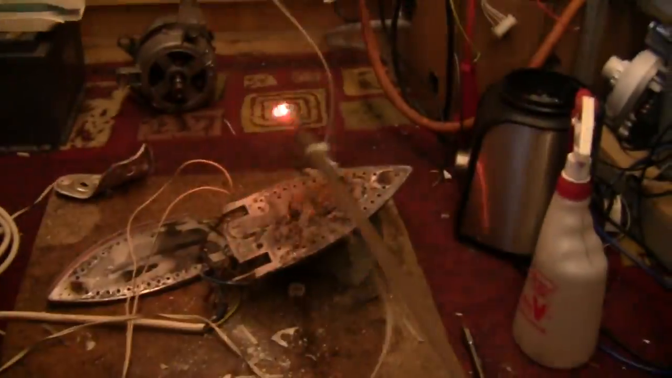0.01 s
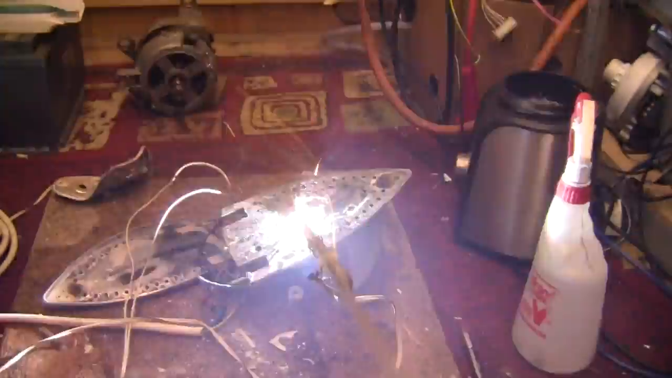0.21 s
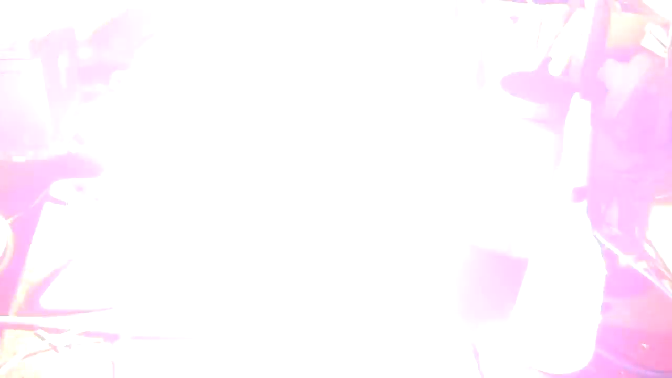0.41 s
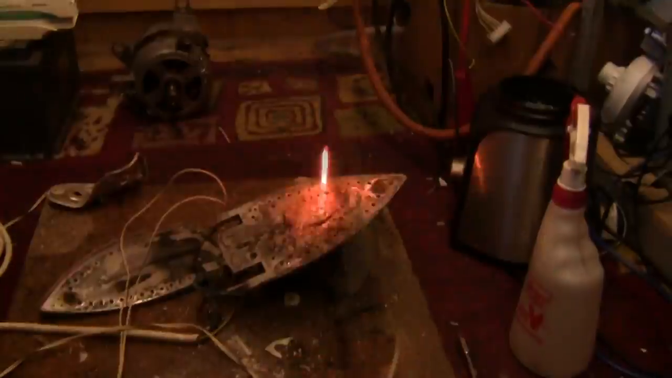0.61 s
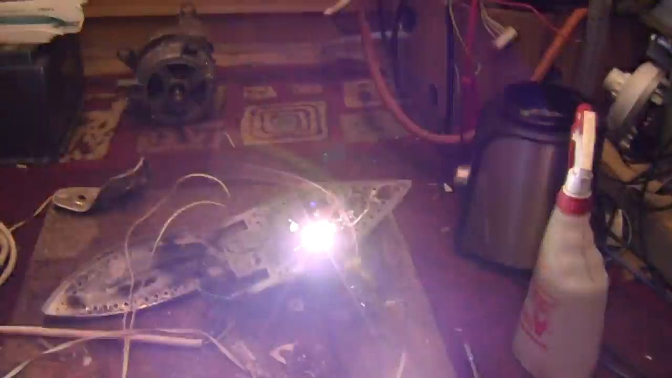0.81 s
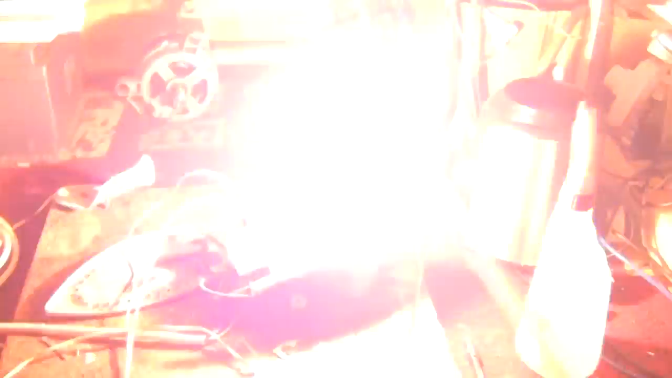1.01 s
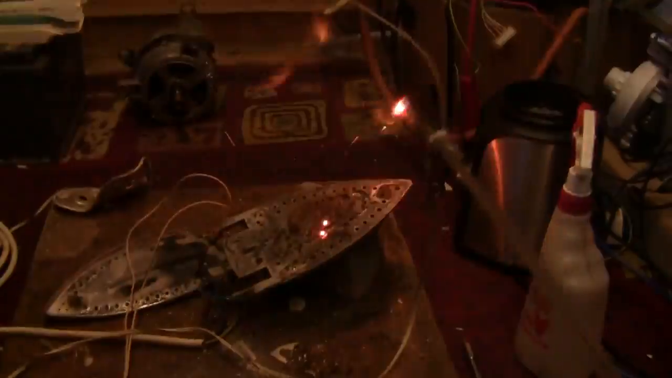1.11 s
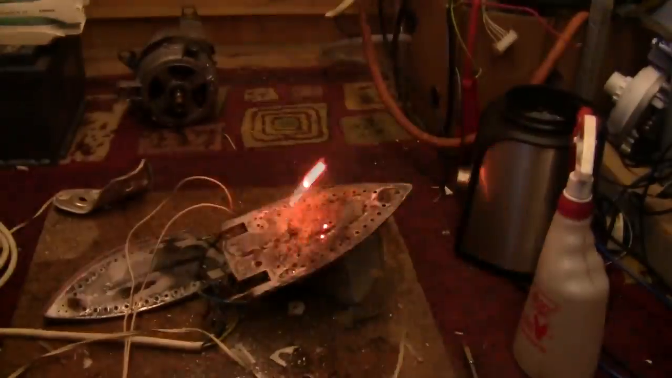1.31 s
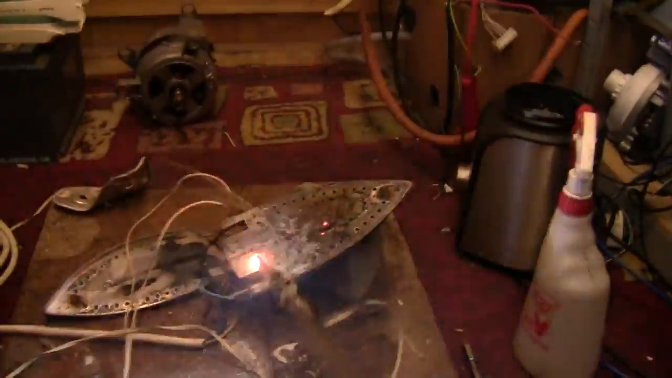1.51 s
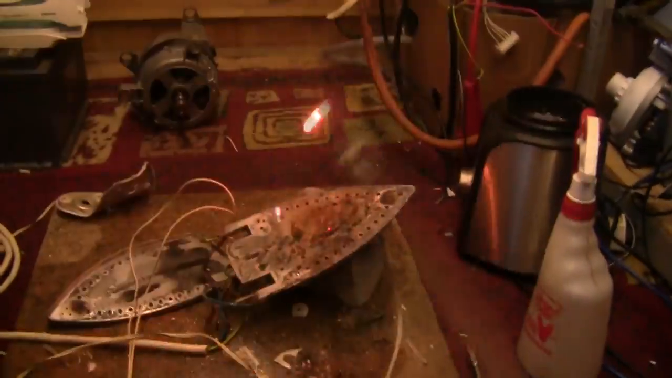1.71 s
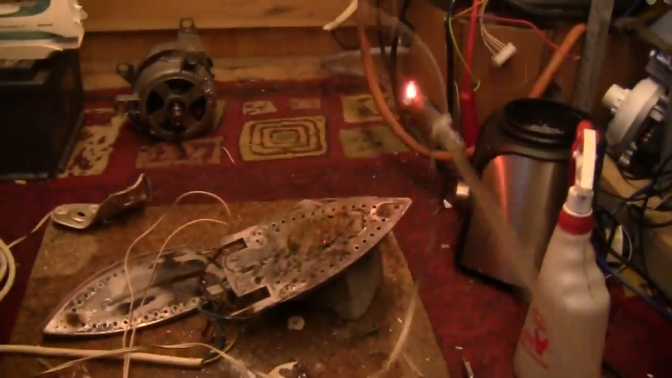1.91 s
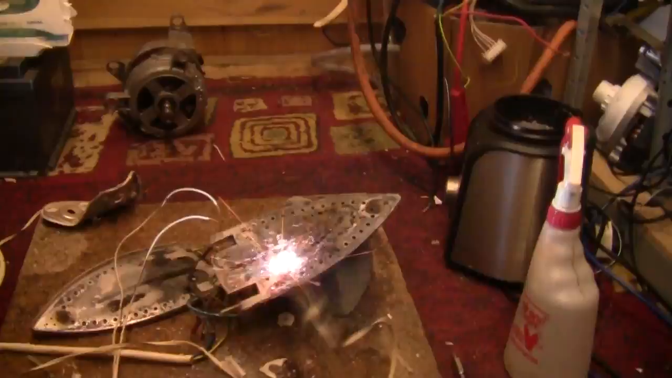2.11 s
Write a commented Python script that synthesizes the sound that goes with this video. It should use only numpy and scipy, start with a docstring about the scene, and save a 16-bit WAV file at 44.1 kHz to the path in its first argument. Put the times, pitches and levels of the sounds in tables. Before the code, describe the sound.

Electric arcs on a clothes iron's metal sole, close in a small workshop with low drone. At 0.24 s a bright crack and loud bang ring the metal; a deep 100 Hz buzz swells from 0.3 to 0.6 s. A duller clank at 0.75 s, fizz and snaps, another throbbing buzz 0.9-1.15 s. Soft fizz from 1.3 s, sharp cracks at 1.5 s, brief sputter at 1.63-1.69 s, then fading hiss and drone.

```python
"""Over a low workshop drone comes a bang with a bright crack at its onset; it rings a clothes iron's metal sole.
A live electrode is dabbed on it: noise bursts make each blast, decaying sines the ringing metal.
Arcs throb and buzz twice per mains cycle, from pulsed partials, snaps and noise, swelling until they break.
The last contact only sputters. Short noise bursts crack as sparks; coloured noise makes a faint background
hiss and a stronger fizz around the later contacts."""
import sys
import numpy as np
from scipy import signal
from scipy.fft import rfft, irfft, next_fast_len
from scipy.io import wavfile
from scipy.ndimage import uniform_filter1d

SR = 44100
rng = np.random.default_rng(int(sys.argv[2]) if len(sys.argv) > 2 else 0)


def persist_wave(psi):
    """Save psi, clipped to +-1, as 16-bit WAV."""
    counts = np.round(np.clip(psi, -1, 1) * 32767).astype(np.int16)
    wavfile.write(sys.argv[1], SR, np.atleast_2d(counts).T)


N = 97020
T = np.arange(N) / SR
SIZE = next_fast_len(N + SR // 2)  # padded so that filter tails do not wrap round
FREQS = np.maximum(np.fft.rfftfreq(SIZE, 1 / SR), 1)
LN_60_DB = np.log(1000)  # a t60 divided by this is an exponential decay time


def amp(db):
    """Amplitude of a level in dB."""
    return 10 ** (np.asarray(db) / 20)


def unit(x):
    """Scale to an RMS of 1."""
    return x / np.sqrt(np.mean(x ** 2))


def gains(points):
    """Gain at every frequency from (f/Hz, level/dB) points, joined on a log frequency axis."""
    hz, db = np.array(points).T
    return amp(np.interp(np.log(FREQS), np.log(hz), db))


def shape(x, gain):
    """Filter by a frequency response."""
    return irfft(rfft(x, SIZE) * gain, SIZE)[..., :N]


def causal(gain):
    """Minimum-phase response of unit power: the colour never sounds ahead of its source."""
    cepstrum = irfft(np.log(unit(gain) + 1e-6), SIZE)
    cepstrum[1:SIZE // 2] *= 2
    cepstrum[SIZE // 2 + 1:] = 0
    return np.exp(rfft(cepstrum))


def fall(start, decay):
    """Sudden onset and exponential decay."""
    return (T >= start) * np.exp(-np.maximum(T - start, 0) / decay)


def walk(rate):
    """Slow random drift with a spread near 1: held random steps, smoothed twice."""
    k = int(SR / rate)
    steps = np.repeat(rng.standard_normal(N // k + 1), k)
    return 2.2 * uniform_filter1d(uniform_filter1d(steps, k), k)[:N]


GRAIN_DB = 2.5  # spread of grain level


def grit():
    """Dense noise with grains of uneven size."""
    return unit(rng.standard_normal(N) * amp(GRAIN_DB * rng.standard_normal(N)))


# how wide diffuse sound is: f/Hz, level of side against mid/dB
WIDTH = [(100, -21), (500, -8.5), (2000, -8), (4000, -4.5), (8000, -2), (13000, 3)]


def diffuse():
    """Stereo noise, alike in the bass and wider in the treble."""
    mid, side = rng.standard_normal((2, N))
    return unit(mid + shape(side, gains(WIDTH)) * np.array([[1], [-1]]))


PULSE_HZ = 100  # two pulses per mains cycle
LIGHT_S = 0.02  # fade-in of an arc


def burning(start, end, release):
    """An arc lights, holds and dies away."""
    return np.clip((T - start) / LIGHT_S, 0, 1) * np.exp(-np.maximum(T - end, 0) / release)


# arcs: lights t/s, breaks t/s, full throb level/dB, buzz level/dB, sizzle level/dB
ARCS = [(0.305, .602, -16, -34.5, -41.5), (0.908, 1.144, -17, -34, -42), (1.638, 1.688, -28, -30, -33)]
# partials of the throb: f/Hz, level in a short arc/dB, level lost in a long arc/dB
THROB_PARTIALS = [(100, 0, 0.5), (200, 1.5, 17.5), (300, -3, 16)]
THROB_RISE_DB, THROB_CURVE = 29, 2.5  # the arc grows quickly at first, then levels off
SOFTEN_CURVE = 1.94  # a long arc gives rounder pulses
THROB_BREAK_S = 0.015
BOOM_HZ, BOOM_T60_S, BOOM_DB = 97.6, 0.54, -8  # low room mode


def throb():
    """Heated air swells each half cycle, louder and rounder as the arc lengthens; a room mode booms along."""
    out = np.zeros(N)
    for start, end, db, _, _ in ARCS:
        length = np.clip((T - start) / (end - start), 0, 1)
        pulses = np.zeros(N)
        for hz, short_db, loss_db in THROB_PARTIALS:
            pulses += amp(short_db - loss_db * length ** SOFTEN_CURVE) * np.cos(2 * np.pi * hz * T)
        swell = amp(db - THROB_RISE_DB * (1 - length) ** THROB_CURVE)
        out += np.sqrt(2) * pulses * swell * burning(start, end, THROB_BREAK_S)
    ring = np.exp(-LN_60_DB * T / BOOM_T60_S)
    mode = 2 * ring / ring.sum() * np.cos(2 * np.pi * BOOM_HZ * T)
    return out + amp(BOOM_DB) * signal.fftconvolve(out, mode)[:N]


# colour of the relighting snaps: f/Hz, level/dB
BUZZ_COLOUR = [(50, -33), (200, -17), (300, -12.5), (400, 4), (500, 0), (620, -4), (800, -8.5), (1200, -15),
               (2500, -20.5), (6000, -44)]
# colour of the sizzle puffs: f/Hz, level/dB
SIZZLE_COLOUR = [(40, -14), (100, -10.5), (260, 14.5), (700, 9.5), (1500, 5.5), (3000, -1), (5400, -4),
                 (8800, -4), (11500, -11), (15500, -36)]
BREAK_S = 0.0068  # decay of buzz, sizzle and flare once the arc breaks
SNAP_SCATTER_DB, SNAP_JITTER_S, SNAP_LEAD_S = 1, .00008, .0007  # snaps come just ahead of the throb peak
SIZZLE_SHARE, SIZZLE_SCATTER_DB = 0.47, 0.5  # puff decay as a share of a half cycle; spread of puff level


def buzz():
    """The arc relights with a snap and a puff of sizzle every half cycle."""
    count = int(N / SR * PULSE_HZ)
    jitter, size, puff = rng.standard_normal((count, 3)).T
    snap_times = np.arange(count) / PULSE_HZ - SNAP_LEAD_S + SNAP_JITTER_S * jitter
    snaps = np.zeros(N)
    snaps[np.clip((snap_times * SR).astype(int), 0, N - 1)] = amp(SNAP_SCATTER_DB * size)

    cycle = T * PULSE_HZ
    puff_number = np.minimum(cycle.astype(int), count - 1)
    puff_decay = np.exp(-(cycle % 1) / SIZZLE_SHARE)
    puffs = unit(grit() * puff_decay * amp(SIZZLE_SCATTER_DB * puff)[puff_number])

    snap_level, puff_level = np.zeros((2, N))
    for start, end, _, snap_db, puff_db in ARCS:
        alight = burning(start, end, BREAK_S)
        snap_level += amp(snap_db) * alight
        puff_level += amp(puff_db) * alight
    snaps = shape(unit(snaps) * snap_level, causal(gains(BUZZ_COLOUR)))
    sizzle = shape(puffs * puff_level, causal(gains(SIZZLE_COLOUR)))
    return snaps, sizzle


# dull colour of the flare: f/Hz, level/dB
FLARE_COLOUR = [(80, -19), (270, 5.5), (550, -2.5), (1200, -8.5), (2200, -19.5), (5000, -33.5),
                (15000, -64)]
FLARE_DB, FLARE_S = -32.5, 0.047  # level; time constant of the swell before the break


def flare():
    """The stretched arc flutters: dull puffs, one per half cycle, grow until it breaks."""
    swell = np.zeros(N)
    for start, end, *_ in ARCS:
        swell += burning(start, end, BREAK_S) * np.exp(np.minimum(T - end, 0) / FLARE_S)
    puffs = unit(grit() * np.exp(-(T * PULSE_HZ % 1) / 0.39))
    return amp(FLARE_DB) * shape(puffs * swell, causal(gains(FLARE_COLOUR)))


# contacts: t/s, level/dB, decay t/s, treble corner f/Hz, metal ring level/dB
STRIKES = [(0.2401, -7.5, 0.007, 5100, -19.5), (0.2491, -15.5, 0.0088, 4500, -30.5),
           (0.7475, -14, 0.014, 2260, -19.5), (0.7554, -27, 0.0077, 2150, -37),
           (0.8629, -26.5, 0.017, 4900, -38), (1.4964, -18.5, 0.013, 1990, -39),
           (1.5127, -22, 0.0089, 2970, -47)]
# ringing modes of the metal sole: f/Hz, level/dB, t60/s
SOLE_MODES = [(512.7, -6.5, 0.21), (879, -14, 0.23), (1300, -12.5, 0.41), (1680, -14, .13),
              (1750, -7, 0.12), (1877, -0.5, 0.23), (2300, -8.5, 0.24), (2526, 2.5, 0.19), (2618, -1, 0.12),
              (2830, -18, 0.088), (3170, -4.5, 0.16), (3205, -4, 0.18), (3465, -3, 0.18), (3930, -10, 0.13),
              (4100, -6.5, 0.1), (6200, -5, 0.22)]
# colour of the blast: f/Hz, level/dB
BANG_COLOUR = [(70, -29), (170, -1.5), (340, -6), (560, -1), (1000, -5), (1400, -11.5), (1900, 1),
               (3100, 0.5), (5000, -8), (9000, 3), (15000, -36)]


def strikes():
    """Each contact blasts off metal and rings the sole; duller contacts weaken the high modes."""
    blast, ring = np.zeros((2, N))
    for start, db, decay, corner_hz, ring_db in STRIKES:
        def dull(hz):
            """Steep treble cut above the corner, levelling off at a small floor."""
            return 1 / np.sqrt(1 + (hz / corner_hz) ** 12) + 0.16

        burst = amp(db) * grit() * fall(start, decay)
        blast += shape(burst, causal(gains(BANG_COLOUR) * dull(FREQS)))
        first = int(start * SR)
        age = T[:min(SR // 2, N - first)]
        for hz, mode_db, t60 in SOLE_MODES:
            level = amp(ring_db + mode_db) * dull(hz)
            mode = np.sin(2 * np.pi * hz * age) * np.exp(-LN_60_DB * age / t60)
            ring[first:first + len(age)] += level * mode
    return blast, ring


# sparks: t/s, level/dB, decay t/s, tilt/dB per octave
SPARKS = [(0.2387, -15.5, 0.0045, 6.5), (0.3208, -27.5, 0.0022, 3), (0.36, -28.5, 0.0024, -1.5),
          (0.404, -30, .003, -0.5), (0.4419, -32.5, 0.0028, 2), (.462, -26.5, 0.0033, 1.5),
          (.503, -24.5, 0.0022, 0), (.560, -33, 0.0022, 4.5), (0.584, -39, 0.0017, 5),
          (.793, -26.5, 0.0015, 0.5), (0.8625, -20, 0.0035, -3.5), (0.9116, -11, 0.0016, 2.5),
          (0.952, -16.5, .002, -4.5), (1.021, -24.5, 0.0026, -5.5), (1.039, -29.5, 0.0018, 2),
          (1.059, -29, .002, 0.5), (1.079, -27.5, 0.0024, -2.5), (1.099, -28.5, 0.0019, 2),
          (1.5045, -9.5, 0.0022, -1), (1.512, -12.5, 0.0049, -1), (1.523, -21, 0.003, -2.5),
          (1.625, -17, 0.002, -1.5), (1.633, -17, 0.0064, 2), (1.644, -19, 0.0065, -1),
          (1.664, -23.5, 0.0042, 0), (1.673, -20, 0.0038, -3.5), (1.683, -17.5, 0.002, 1),
          (1.967, -41, 0.0053, -0.5), (2.108, -41, .002, 5.5)]
# colour of the cracks: f/Hz, level/dB
CRACK_COLOUR = [(100, -8), (600, 0.5), (1500, -2), (2600, -3), (3700, 3), (5400, -3), (7800, -0.5),
                (9800, -1.5), (11200, -11), (15500, -26.5)]


def sparks():
    """Short cracks of bursting droplets, each with its own tilt, without bass."""
    colour = gains(CRACK_COLOUR) / (1 + (150 / FREQS) ** 4)
    out = np.zeros(N)
    for start, db, decay, tilt_db in SPARKS:
        tilt = amp(tilt_db * np.log2(FREQS))
        out += shape(amp(db) * grit() * fall(start, decay), causal(colour * tilt))
    return out


# colour of the hiss and fizz: f/Hz, level/dB
HISS_COLOUR = [(200, -10), (1500, 1), (3600, 1), (5400, 0.5), (8000, 0.5), (9800, 4), (11500, -7.5),
               (15500, -21)]
# level of the hiss: low in the background, dipping after the bang, plus fizz around later contacts: t/s, level/dB
HISS_LEVEL = [(0, -58), (.12, -60.5), (.22, -62), (.73, -63), (.78, -43.5), (.89, -42), (.98, -51),
              (1.19, -65), (1.29, -65), (1.32, -51.5), (1.42, -49.5), (1.55, -51), (1.76, -49.5),
              (1.85, -55), (1.97, -56), (2.04, -63), (2.2, -64)]


def hiss_and_fizz():
    """Gritty noise on one level curve: a faint background hiss, and fizz around the later contacts."""
    times, levels_db = np.array(HISS_LEVEL).T
    return unit(shape(grit(), gains(HISS_COLOUR))) * amp(np.interp(T, times, levels_db))


# room decay: band edge f/Hz, t60/s
ROOM_DECAY = [(60, 0.55), (400, .33), (1500, 0.26), (4000, 0.22), (9000, 0.2), (17000, .15)]
ROOM_DB, EARLY_DB = -5, -5  # tail and early reflections
EARLY_S, ROOM_GAP_S = 0.0092, 0.0019  # early decay; delay before the first reflection


def room(x):
    """Quick reflections from floor and clutter, then a short tail that decays band by band."""
    noise = diffuse()
    tail = 0
    for (low_hz, low_t60), (high_hz, high_t60) in zip(ROOM_DECAY, ROOM_DECAY[1:]):
        band = shape(noise, (FREQS >= low_hz) & (FREQS < high_hz))
        tail = tail + band * fall(ROOM_GAP_S, (low_t60 + high_t60) / 2 / LN_60_DB)
    early = diffuse() * fall(ROOM_GAP_S, EARLY_S)
    response = (amp(ROOM_DB) * unit(tail) + amp(EARLY_DB) * unit(early)) / np.sqrt(N)
    return signal.fftconvolve(x[None], response, axes=1)[:, :N]


# colour of the low room noise: f/Hz, level/dB
DRONE_COLOUR = [(20, -8), (38, -4), (62, -12.5), (105, 9.5), (150, -5), (210, 3.5), (340, -8.5), (600, -12),
                (1200, -18), (2200, -22.5), (4500, -38), (9500, -46), (15000, -59.5)]
# wavering room tones: f/Hz, level/dB
TONES = [(100, -57), (107.7, -50), (193.8, -60.5)]
DRONE_DB, DRONE_FALL_DB_PER_S = -42, 1  # starting noise level; slow fade of noise and tones


def drone():
    """Low room noise with a few tones that waver in level and phase, slowly sinking."""
    air = unit(shape(diffuse(), gains(DRONE_COLOUR))) * amp(DRONE_DB)
    tones = np.zeros(N)
    for hz, db in TONES:
        level = amp(db + walk(11.8)) * np.sqrt(2)
        tones += level * np.sin(2 * np.pi * hz * T + .5 * walk(4.98))
    return (air + tones) * amp(-DRONE_FALL_DB_PER_S * T)


# stereo balance: f/Hz, left minus right level/dB
BALANCE = [(100, -0.5), (350, 1.8), (1000, -0.4), (2000, -0.5), (4000, -1.5), (6000, -3.5), (8500, -4),
           (12000, -12)]
BUZZ_WET, RING_WET = 0.8, .3  # share of snaps and metal ring sent to the room


def scene():
    """All sources in the room; the treble leans to the right."""
    snaps, sizzle = buzz()
    blast, ring = strikes()
    crackle = blast + sparks() + sizzle + flare() + hiss_and_fizz()
    direct = crackle + ring + snaps + throb()
    reflected = room(crackle + BUZZ_WET * snaps + RING_WET * ring)
    lean = np.sqrt(gains(BALANCE))  # half the difference on each side
    return shape(direct + reflected + drone(), np.array([lean, 1 / lean]))


TOP_HZ = 15800


def record(dry):
    """Soft saturation rounds the loudest peaks, then a steep filter cuts the extreme treble."""
    rounded = np.tanh(dry)
    return signal.sosfilt(signal.ellip(8, .2, 70, TOP_HZ, fs=SR, output="sos"), rounded)


dry = scene()
out = record(dry)
persist_wave(out)
```